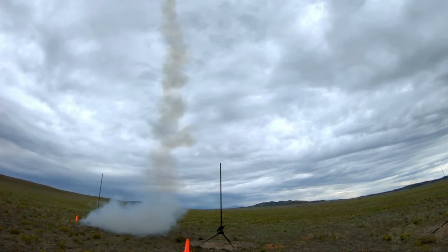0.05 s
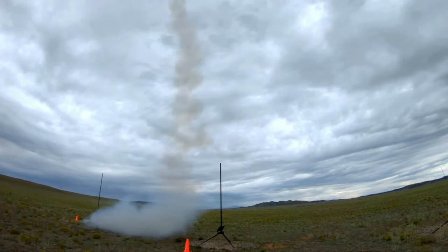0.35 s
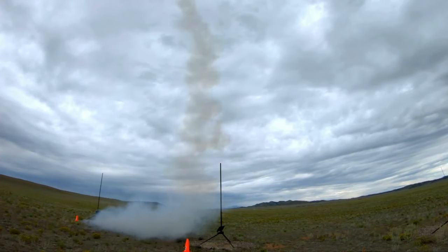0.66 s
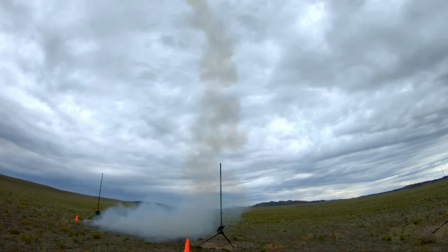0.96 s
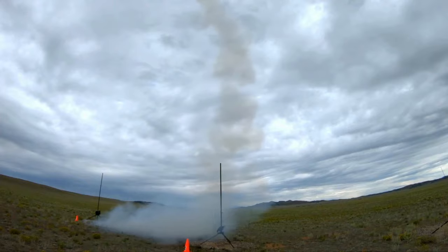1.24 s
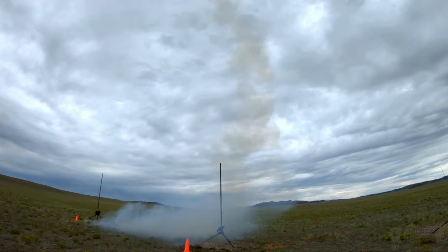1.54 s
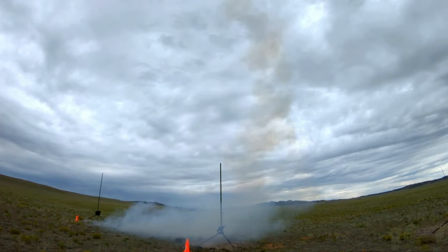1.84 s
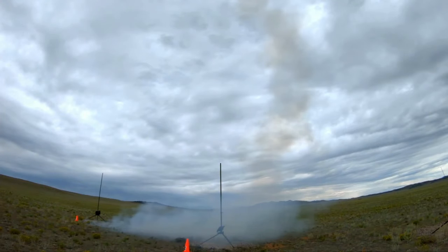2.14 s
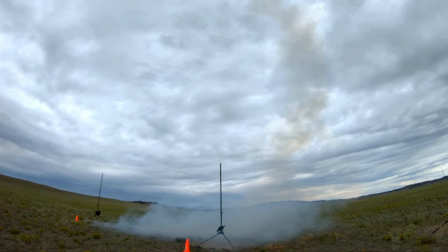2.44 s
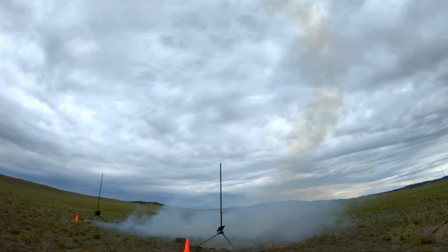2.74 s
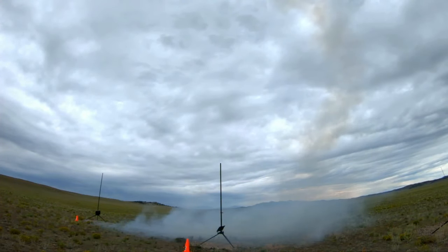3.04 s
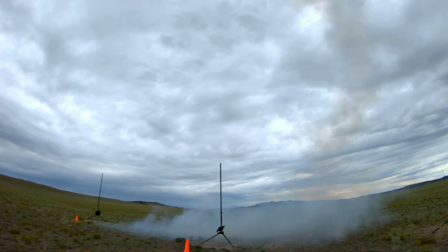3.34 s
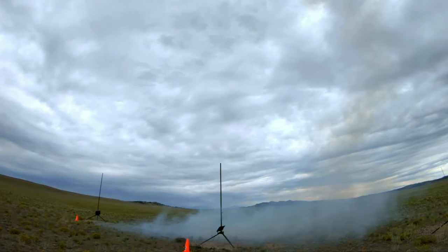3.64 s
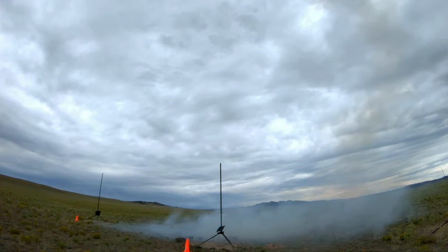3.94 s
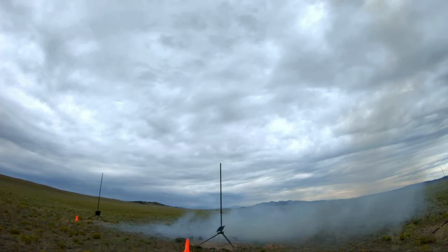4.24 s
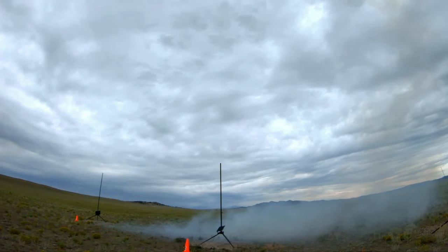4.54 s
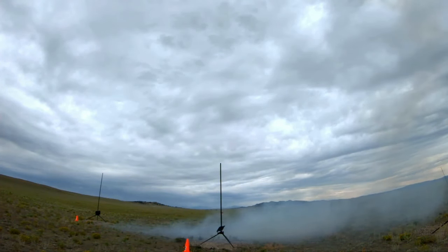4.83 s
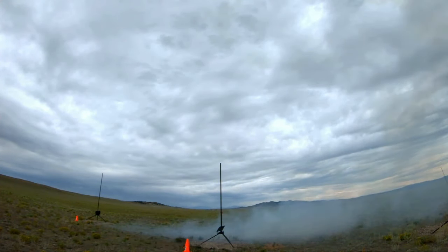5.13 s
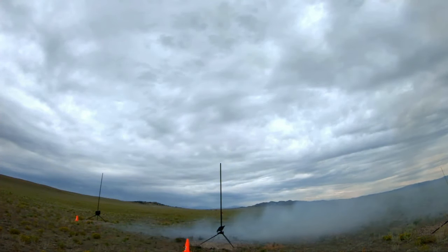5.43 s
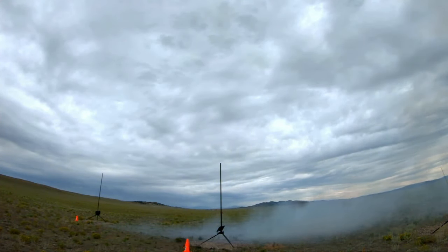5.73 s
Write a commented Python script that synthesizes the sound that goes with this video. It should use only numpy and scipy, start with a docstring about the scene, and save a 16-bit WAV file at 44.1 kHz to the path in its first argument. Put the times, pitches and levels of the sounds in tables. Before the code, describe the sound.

The hollow roar of a climbing rocket drops to a dying hiss, leaving low wind rumble and gusts thumping the microphone.

```python
"""Rocket launch over a windy field.

A rocket climbs away, heard by a small camera on a stand about a metre up. Its crackling jet arrives
directly and off the ground, giving a hollow roar that drops to a fading hiss at burnout. Gusts buffet
the microphone over a wind rumble that briefly hoots; something small tinkles faintly."""
import sys
import numpy as np
from scipy import signal
from scipy.fft import rfft, irfft, next_fast_len
from scipy.io import wavfile
from scipy.ndimage import uniform_filter1d

SR = 44100
rng = np.random.default_rng(int(sys.argv[2]) if len(sys.argv) > 2 else 0)


def store_wav(level_fs):
    """Save 16-bit WAV to argv[1]."""
    pcm = np.round(np.clip(np.atleast_2d(level_fs), -1, 1) * 32767)
    wavfile.write(sys.argv[1], SR, pcm.T.astype(np.int16))


N = 254898
FFT_SIZE = next_fast_len(N + SR // 4, real=True)
TIME, FREQ = np.arange(N) / SR, np.maximum(np.fft.rfftfreq(FFT_SIZE, 1 / SR), 1)
SAG_S, BURNOUT_S = 0.75, 0.866  # thrust sags, then cuts
LIGHT_AIR_DB = -46  # flow between gusts


def undb(db):
    """Decibels to gain."""
    return 10 ** (np.asarray(db) / 20)


def unit(x):
    """Scale to rms 1."""
    return x / np.sqrt(np.mean(x ** 2))


def even(x, samples):
    """Hold the short-term power of a noise near 1."""
    return x / np.sqrt(uniform_filter1d(uniform_filter1d(x ** 2, samples), samples))


def curves(table):
    """Columns of a time table at every sample."""
    times_s, *columns = np.transpose(table)
    return [np.interp(TIME, times_s, column) for column in columns]


def ramp(start_s, end_s):
    """Linear rise from 0 to 1."""
    return np.clip((TIME - start_s) / (end_s - start_s), 0, 1)


def after(s):
    """Seconds since s, 0 before."""
    return np.maximum(TIME - s, 0)


def bump(s, half_s):
    """Gaussian envelope, 1 at time s."""
    return np.exp(-((TIME - s) / half_s) ** 2)


def swell_db(s, hold_s, rise_db_per_s, fall_db_per_s):
    """Rise to 0 dB at time s, hold, fall."""
    return -rise_db_per_s * np.maximum(s - TIME, 0) - fall_db_per_s * after(s + hold_s)


def walk(rate_hz):
    """Smoothed random steps, rms 1."""
    hold = int(SR / rate_hz)
    steps = np.repeat(rng.standard_normal(N // hold + 1), hold)
    return unit(uniform_filter1d(uniform_filter1d(steps, hold), hold)[:N])


def shocks(rate_hz, spread_db):
    """Steep pressure fronts at random times, a few much stronger; rms 1."""
    arrivals = rng.random(N) < rate_hz / SR
    return unit(arrivals * undb(spread_db * np.minimum(rng.exponential(size=N), 4)))


def filtered(x, gain):
    """Apply a gain per frequency, with mirrored ends."""
    lead = (FFT_SIZE - N) // 2
    padded = np.pad(x, (lead, FFT_SIZE - N - lead), "reflect")
    return irfft(rfft(padded) * gain, FFT_SIZE)[lead:lead + N]


def colour(x, spectrum):
    """Shape x by (f/Hz, level/dB) points, -25 dB/oct beyond the ends; rms 1."""
    hz, db = np.transpose(spectrum)
    outside_oct = np.abs(np.log2(FREQ / np.clip(FREQ, hz[0], hz[-1])))
    gain_db = np.interp(np.log(FREQ), np.log(hz), db) - 25 * outside_oct
    return unit(filtered(x, undb(gain_db)))


def noise(spectrum):
    """Gaussian noise shaped by (f/Hz, level/dB) points; rms 1."""
    return colour(rng.standard_normal(N), spectrum)


def tilt(x, db_per_oct, pivot_hz):
    """Time-varying slope over the three octaves above the pivot."""
    octaves = np.clip(np.log2(FREQ / pivot_hz), 0, 3)
    bands = [filtered(x, np.maximum(1 - np.abs(octaves - k), 0)) for k in range(4)]
    return sum(band * undb(k * db_per_oct) for k, band in enumerate(bands))


def moving_band(x, centre_hz, half_width_hz):
    """The part of x around a moving centre."""
    phase = 2 * np.pi * np.cumsum(centre_hz) / SR
    lowpass = np.exp(-(FREQ / half_width_hz) ** 2)
    return 2 * sum(filtered(x * carrier, lowpass) * carrier for carrier in (np.cos(phase), np.sin(phase)))


def add(out, s, sound):
    """Mix in a short sound at time s."""
    start = int(np.clip(s * SR, 0, N - 1))
    out[start:start + len(sound)] += sound[:N - start]


def wind_flow_db():
    """Wind strength at the microphone: gusts and light air add in power."""
    # gusts: t/s, hold/s, level/dB
    arrivals = [(0.284, 0.2, -30.5), (0.669, 0.031, -33), (0.939, 0.22, -30), (1.137, 0.095, -28.5),
                (1.279, 0.22, -31), (1.568, 0.089, -33), (1.75, 0.11, -31), (2.204, 0.35, -33),
                (2.66, 0.12, -41.5), (2.865, 0.048, -38), (3.055, 0.022, -37.5), (3.298, 0.42, -42),
                (4.226, 0.39, -45.5), (4.59, .16, -41.5), (5.08, 0.16, -40.5), (5.362, 0.097, -38.5),
                (5.67, .2, -36)]
    power = sum(undb(db + swell_db(s, hold_s, rise_db_per_s=157, fall_db_per_s=124.5)) ** 2
                for s, hold_s, db in arrivals)
    return 10 * np.log10(power + undb(LIGHT_AIR_DB) ** 2)


def field(flow_db):
    """Wind rumbles about the stand; a soft hiss stirs with the gusts."""
    # rumble strength: t/s, level/dB
    breeze = [(2.0, -64.5), (2.3, -59.5), (3.4, -51), (3.75, -46.5), (4.15, -47), (4.8, -51), (5.78, -47)]
    # rumble and hiss spectra: f/Hz, level/dB
    rumble_spectrum = [(50, -13), (110, -10), (200, -6.5), (280, 0), (340, -0.5), (390, -5.5), (460, -22),
                       (550, -16.5), (660, -16), (780, -30), (1000, -47.5)]
    hiss_spectrum = [(900, -3.5), (1400, -6.5), (2500, -9), (3300, -7), (4600, -16.5), (5400, -28),
                     (7000, -36), (13000, -46)]
    rumble = noise(rumble_spectrum) * undb(curves(breeze)[0] + 2 * walk(rate_hz=10))
    hiss = noise(hiss_spectrum) * undb(-74.5 + 0.5 * walk(rate_hz=9.7) + 0.1 * (flow_db - LIGHT_AIR_DB))
    return rumble + hiss


def hoots():
    """Hollow, wavering notes swell out of the wind and sink in pitch."""
    # notes at their peak: t/s, half length/s, f/Hz, level/dB
    notes = [(3.718, 0.064, 391.5, -46), (3.734, 0.027, 280.2, -39), (3.79, 0.095, 326, -45.5),
             (3.896, 0.019, 417, -50), (4.275, 0.065, 308.7, -47.5)]
    sink_hz_per_s, waver = 250, 0.023
    out = np.zeros(N)
    for s, half_s, hz, db in notes:
        pitch_hz = (hz - sink_hz_per_s * (TIME - s)) * (1 + waver * walk(rate_hz=110))
        tone = np.sin(2 * np.pi * np.cumsum(pitch_hz) / SR)
        out += tone * undb(db + 1.6 * walk(rate_hz=24)) * bump(s, half_s)
    return out


def knocks():
    """Faint dry knocks, each a short noise burst."""
    # bursts: t/s, level/dB, centre/Hz, half width/oct
    bursts = [(2.103, -64, 3630, 0.21), (2.335, -69.5, 2000, 2), (2.553, -68.5, 1800, 0.88),
              (2.65, -74, 1700, 2.1), (2.875, -75, 1900, 1.7)]
    out = np.zeros(N)
    for s, db, hz, octaves in bursts:
        band = noise([(hz / 2 ** octaves, -10), (hz, 0), (hz * 2 ** octaves, -10)])
        out += band * undb(db) * bump(s, half_s=0.011)
    return out


def crackles():
    """Faint, brief crackles in the treble."""
    # bursts: t/s, level/dB
    bursts = [(1.1, -69), (1.38, -68.5), (1.66, -74), (1.765, -71.5), (1.888, -73.5), (2.212, -77.5),
              (2.555, -74.5), (2.875, -77), (3.163, -78), (3.258, -78), (3.598, -77), (3.658, -78),
              (3.851, -77), (3.925, -81), (4.24, -82), (4.26, -85), (4.32, -85), (4.342, -86), (4.36, -76),
              (4.43, -83), (4.52, -77.5), (4.622, -78), (4.768, -75), (5.215, -81.5), (5.575, -89),
              (5.595, -76.5), (5.666, -75.5), (5.76, -77.5)]
    # crackle spectrum: f/Hz, level/dB
    spectrum = [(2000, 1), (5000, -0.5), (7000, -3.5), (10000, -8.5), (12500, -11.5), (13500, -29)]
    grit = colour(even(shocks(rate_hz=2500, spread_db=6), samples=400), spectrum)
    return grit * sum(undb(db) * bump(s, half_s=0.011) for s, db in bursts)


def tinkles():
    """Light scraping touches ring a small metal thing."""
    # touches: t/s, peak/dB, gain of the modes below split_hz/dB
    touches = [(2.570, -76, -2), (2.615, -80, -12), (2.675, -75, -12), (2.72, -75, -12), (2.765, -75, -4),
               (2.84, -76, -8), (2.891, -64.5, -17), (2.909, -65, 10), (2.985, -74, 20), (3.086, -63, -3),
               (3.098, -68, 0), (3.205, -75, -8), (3.228, -78, 6), (3.343, -76, -6), (3.889, -85, -18),
               (4.058, -84, -18)]
    # metal's modes: f/Hz, level/dB, t60/s
    modes = [(5850, -8, .06), (6335, 3, 0.093), (6600, -4.5, 0.034), (7000, -4, .04), (7400, -12, .04),
             (8100, -13, .04), (9000, -3, 0.06), (9070, 0, .07), (9150, -2, .04)]
    split_hz, detune = 7800, 0.0037
    out, t = np.zeros(N), np.arange(SR // 5) / SR
    lowpass = signal.butter(6, 10000, fs=SR, output="sos")
    for s, peak_db, lower_db in touches:
        ring = np.zeros(len(t))
        for hz, mode_db, t60_s in modes:  # each contact favours other modes and detunes them
            gain = undb(mode_db + lower_db * (hz < split_hz) + 2 * rng.standard_normal())
            detuned_hz = hz * (1 + detune * rng.standard_normal())
            ring += gain * np.sin(2 * np.pi * detuned_hz * t) * undb(-60 * t / t60_s)
        scrape = rng.standard_normal(len(t)) ** 3 * t * np.exp(-t / 0.0085)
        touch = signal.fftconvolve(signal.sosfilt(lowpass, scrape), ring)
        add(out, s - 0.01, undb(peak_db) * touch / np.abs(touch).max())
    return out


def whistle():
    """A very high, thin tone sounds for an instant."""
    pitch_hz, level_db = 15014, -39
    gate = np.sin(np.pi / 2 * (ramp(4.110, 4.119) - ramp(4.137, 4.146))) ** 2
    return undb(level_db) * gate * np.sin(2 * np.pi * pitch_hz * TIME)


def gusts(flow_db):
    """Eddies tumble over the microphone, louder and brighter with the flow and with each swirl."""
    # eddy spectrum: f/Hz, level/dB
    spectrum = [(38, -34.5), (65, -4.5), (123, 0), (187, -3), (226, -5), (358, -14), (524, -24), (620, -30),
                (751, -31), (950, -51), (1240, -77.5), (2090, -120)]
    eddies = even(noise(spectrum), samples=1000)
    swirl = 2.3 * np.tanh(walk(rate_hz=64))
    excess_db = flow_db + 33.5  # re a moderate gust
    db_per_oct = -0.2 + 0.05 * excess_db + 0.27 * swirl
    flutter = tilt(eddies, db_per_oct, pivot_hz=154) * undb(flow_db + 1.3 * swirl - 1.64)
    # the largest eddies hardly feel the gusts
    deep = noise([(25, -24.5), (42, -5), (58, -7), (80, -3.5)])
    return flutter + deep * undb(-44.5 + 0.22 * excess_db)


def buffets(flow_db, stray_count=40):
    """Tight vortices hit the port: one pressure swing each, the hardest with a brighter flutter."""
    # hardest vortices: t/s, peak/dB, nominal f/Hz, flutter/dB
    vortices = [(0.289, -28, 110, -38), (0.32, -16.5, 120, -44), (0.386, -20, 110, -43),
                (.666, -34, 100, -48), (0.987, -36, 150, -32), (1.055, -43, 103, -34),
                (1.099, -27, 175, -35), (1.168, -18, 178, -45), (1.189, -23, 135, -30),
                (1.216, -18, 150, -37), (1.288, -23, 130, -53), (1.323, -19.5, 158, -38),
                (1.343, -23, 205, -35), (1.350, -19, 180, -42), (1.383, -23, 260, -32),
                (1.397, -21.5, 466, -33.5), (1.438, -19.5, 212, -36), (1.457, -17, 234, -40),
                (1.47, -34, 130, -35), (1.501, -17, 160, -52), (1.556, -22.5, 139, -39.5),
                (1.661, -26, 97, -49), (1.742, -30, 161, -38.5), (1.764, -23.5, 192, -43),
                (1.812, -22, 157, -51), (1.835, -27, 129, -43), (1.847, -18, 108, -52),
                (1.888, -23.5, 138, -53), (2.18, -30.5, 130, -54), (2.21, -32, 110, -52),
                (2.247, -20, 134, -43), (2.290, -22.5, 171, -41), (2.304, -17, 177, -46),
                (2.366, -30, 111, -46), (2.395, -32, 150, -47), (2.458, -20, 125, -42),
                (2.514, -27, 105, -44), (2.552, -29, 151, -53), (2.887, -23.5, 159, -55),
                (3.071, -44, 121, -45.5), (3.85, -31, 111, -54), (4.364, -26, 170, -46),
                (4.468, -33, 266, -55), (4.527, -31, 220, -43.5), (4.635, -27, 108, -42),
                (5.12, -28.5, 130, -46), (5.354, -28.5, 108, -45), (5.405, -24, 150, -52),
                (5.438, -36, 149, -52), (5.675, -26.5, 105, -44), (5.716, -39, 125, -43),
                (5.751, -21, 151, -42)]
    # flutter spectrum: f/Hz, level/dB
    flutter_spectrum = [(170, 2), (250, 1), (400, -3), (560, -6), (750, -15.5), (950, -31.5)]
    flutter_half_s = 0.0085
    swings, flutter_gain = np.zeros(N), np.zeros(N)
    t = np.arange(-SR // 50, SR // 50) / SR
    hits = [row[:3] for row in vortices]
    for position, pitch in rng.random((stray_count, 2)):  # lesser hits, scaled by the flow
        i = int(position * N)
        hits.append((TIME[i], flow_db[i] + 2.5, 164 * 2 ** (pitch - 0.5)))
    for s, peak_db, nominal_hz in hits:
        phase_sq = (np.pi * 0.9 * nominal_hz * t) ** 2
        add(swings, s + t[0], undb(peak_db) * (1 - 2 * phase_sq) * np.exp(-phase_sq))
    for s, _, _, flutter_db in vortices:
        add(flutter_gain, s + t[0], undb(flutter_db) * np.exp(-(t / flutter_half_s) ** 2))
    return swings + flutter_gain * even(noise(flutter_spectrum), samples=500)


def spent_motor():
    """The last grain burns at low pressure: a sputtering hiss that starts dull, thins and dies."""
    # spectra of the hiss and its top fizz: f/Hz, level/dB
    hiss_spectrum = [(300, -14), (900, -6), (1400, -7), (1800, -5.5), (2400, -7.5), (3100, -2), (3500, -3),
                     (4700, -0.5), (6000, -15), (7500, -28), (9000, -43.5), (12000, -74.5)]
    fizz_spectrum = [(4800, -9.5), (5800, 4), (7700, -0.5), (8500, -15), (10400, -15), (11500, -48)]
    spent_s, ebb_db_per_s, die_db_per_s = 1.47, 19.5, 46
    thin_s, fizz_end_s, fizz_die_db_per_s = 0.29, 1.544, 107.5
    onset = ramp(SAG_S, BURNOUT_S)
    hiss_db = -43 - ebb_db_per_s * after(BURNOUT_S) - (die_db_per_s - ebb_db_per_s) * after(spent_s)
    db_per_oct = -16.5 * np.exp(-after(BURNOUT_S) / thin_s)
    gas = colour(rng.standard_normal(N) + 0.5 * shocks(rate_hz=570, spread_db=1.5), hiss_spectrum)
    hiss = tilt(gas, db_per_oct, pivot_hz=2480) * undb(hiss_db + 0.8 * walk(rate_hz=75))
    # the dying jet narrows to a sizzle
    sizzle = noise([(3000, -12), (4400, 6.5), (5100, -4), (6000, -26.5)])
    sizzle_db = -63 + swell_db(1.597, hold_s=0, rise_db_per_s=97, fall_db_per_s=24.5)
    fizz = noise(fizz_spectrum) * undb(-69 - fizz_die_db_per_s * after(fizz_end_s))
    return (hiss + fizz) * onset + sizzle * undb(sizzle_db)


def roar():
    """Turbulent mixing noise and shocks recede, sag as the grain runs out, and cut at burnout."""
    # jet spectrum: f/Hz, level/dB
    spectrum = [(50, -29), (110, -5), (300, -2.5), (450, 0.5), (600, 0), (880, -5), (1150, -7.5),
                (1600, -11.5), (3000, -21.5), (4600, -24), (6200, -37.5), (7700, -41.5), (8700, -54.5),
                (10500, -56), (12500, -86)]
    # wandering band of rasp: t/s, centre/Hz, level re jet/dB
    rasp_track = [(0, 2900, -13), (.12, 2950, -14.5), (.28, 2990, -16), (.45, 3060, -22), (.6, 2850, -24),
                  (.75, 2880, -20), (.87, 2800, -21)]
    recede_db_per_s, sag_db_per_s, cut_db_per_s = 3, 24.5, 315
    level_db = -28 - recede_db_per_s * TIME - sag_db_per_s * after(SAG_S) - cut_db_per_s * after(BURNOUT_S)
    jet = colour(rng.standard_normal(N) + 0.43 * shocks(rate_hz=1500, spread_db=2.5), spectrum)
    db_per_oct = 0.5 - 2.5 * np.minimum(TIME, BURNOUT_S)  # the growing path dulls the treble
    jet = tilt(jet, db_per_oct, pivot_hz=870)
    rasp_hz, rasp_db = curves(rasp_track)
    roughness = noise([(15, 5), (100, 3.5), (280, -5.5), (450, -8)])
    rasp = unit(roughness * np.cos(2 * np.pi * np.cumsum(rasp_hz) / SR)) * undb(rasp_db)
    return (jet + rasp) * undb(level_db + 0.2 * walk(rate_hz=33.3))


def echo(x, lags, gain, cutoff_hz):
    """A surface returns the sound slightly later, its treble softened."""
    dulled = filtered(x * ramp(0, 0.0028), 1 / np.hypot(1, FREQ / cutoff_hz))
    return gain * np.interp(TIME - curves(lags)[0], TIME, dulled)


def housing(x):
    """The camera's case lifts some bands and absorbs others."""
    # case resonances: f/Hz, width/Hz, gain/dB
    resonances = [(820, 150, 3), (1880, 144, 5.5), (1720, 126, 4.5), (1762, 30, 3.5), (2344, 230, -1.5),
                  (2760, 200, -0.5), (3355, 26, 8), (3540, 85, 5.5)]
    gain_db = sum(db * np.exp(-2 * ((FREQ - hz) / width_hz) ** 2) for hz, width_hz, db in resonances)
    return filtered(x, undb(gain_db))


def rocket():
    """The motor arrives directly, off the ground and off a near surface; notches slide as it climbs."""
    # echo delays, growing with the climb: t/s, lag/s
    ground_lags = [(0, .00672), (.2, .00678), (.6, .00681), (1.0, .00686), (1.6, .00689)]
    near_lags = [(0, .00222), (.5, .00226), (1.0, .00228)]
    # hollow sweeping upward: t/s, centre/Hz, gain/dB
    hollow = [(0, 2150, 3.5), (.18, 2150, -3), (.4, 2320, -7), (.65, 2380, -1), (.85, 3120, -7),
              (1.2, 3150, -7)]
    direct = roar() + spent_motor()
    ground = echo(direct, ground_lags, gain=0.71, cutoff_hz=2300)
    near = echo(direct, near_lags, gain=0.097, cutoff_hz=2500)
    sound = direct + ground + near
    hollow_hz, hollow_db = curves(hollow)
    sound += (undb(hollow_db) - 1) * moving_band(sound, hollow_hz, half_width_hz=160)
    return housing(sound) * undb(-1.6)


def scene():
    """All centred except the whistle on the right."""
    flow_db = wind_flow_db()
    centre = rocket() + gusts(flow_db) + buffets(flow_db) + field(flow_db)
    centre += hoots() + knocks() + tinkles() + crackles()
    return np.array([centre, centre + whistle()])


def record(dry):
    """The camera cuts the deepest rumble and the very top; short fades prevent clicks."""
    low_hz, top_hz = 30, 15800
    highpass = signal.butter(2, low_hz, "high", fs=SR, output="sos")
    lowpass = signal.ellip(8, 0.2, 70, top_hz, fs=SR, output="sos")
    fade_in = np.sin(np.pi / 2 * ramp(0, 0.001)) ** 2
    fade_out = np.cos(np.pi / 2 * ramp(TIME[-1] - 0.005, TIME[-1])) ** 2
    return signal.sosfilt(lowpass, signal.sosfilt(highpass, dry) * fade_in * fade_out)


dry = scene()
out = record(dry)
store_wav(out)
```